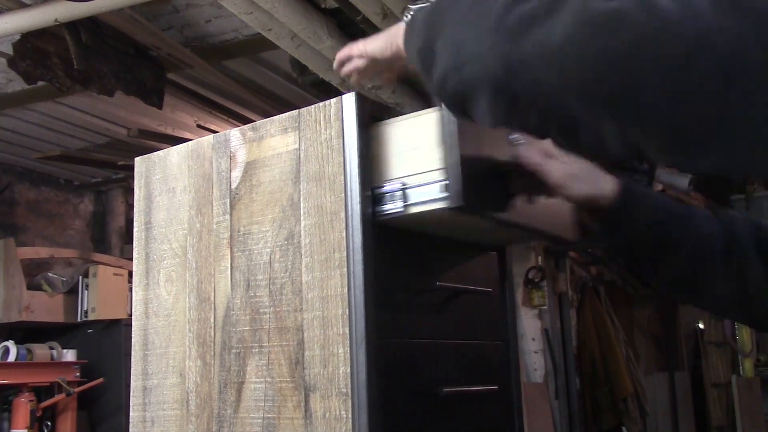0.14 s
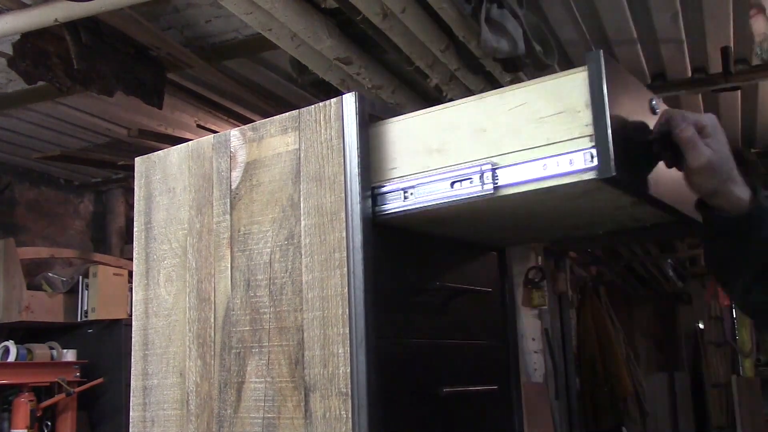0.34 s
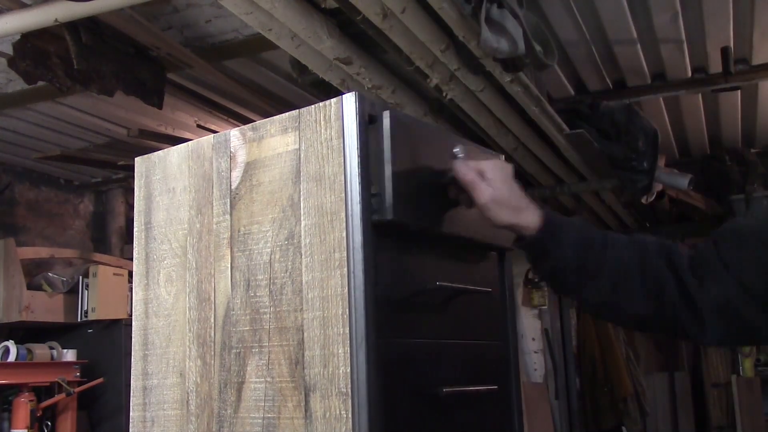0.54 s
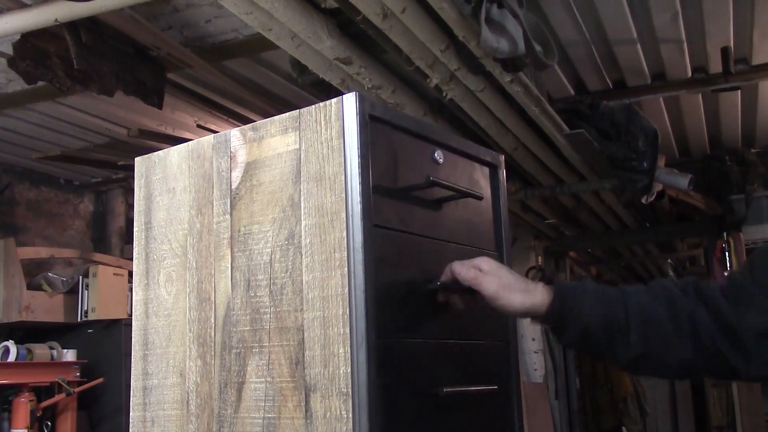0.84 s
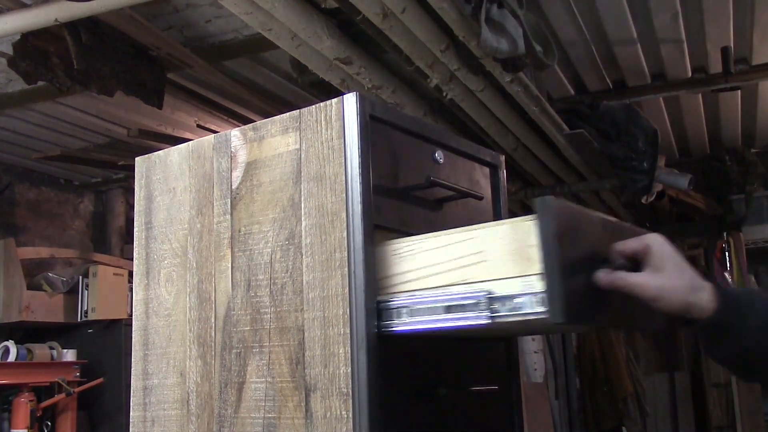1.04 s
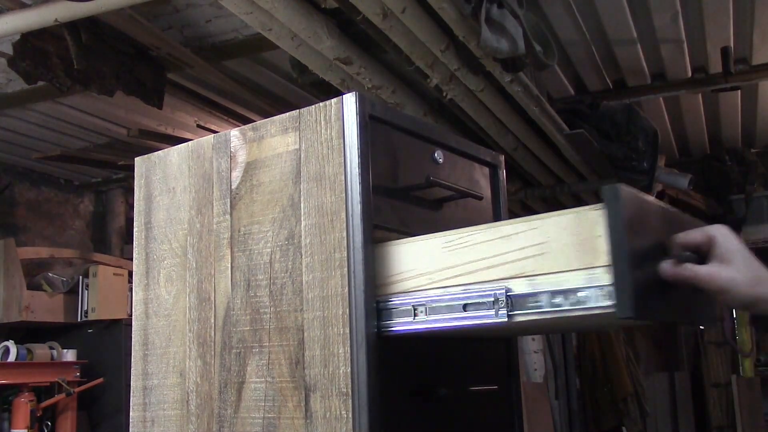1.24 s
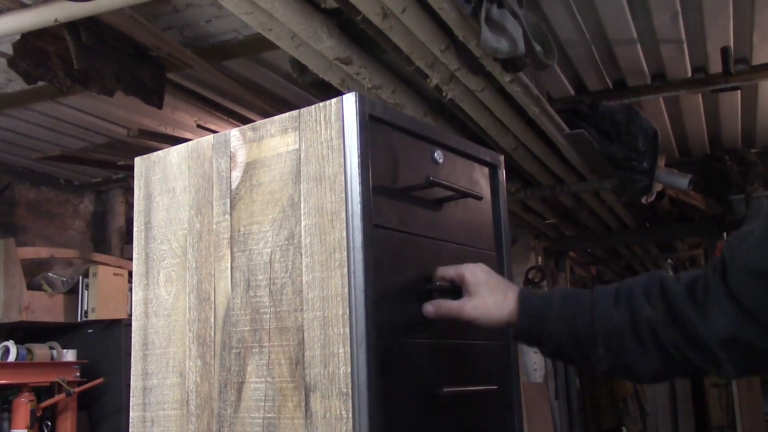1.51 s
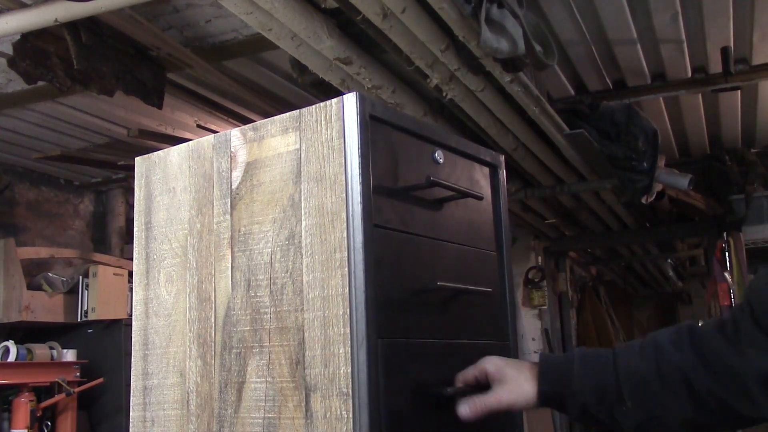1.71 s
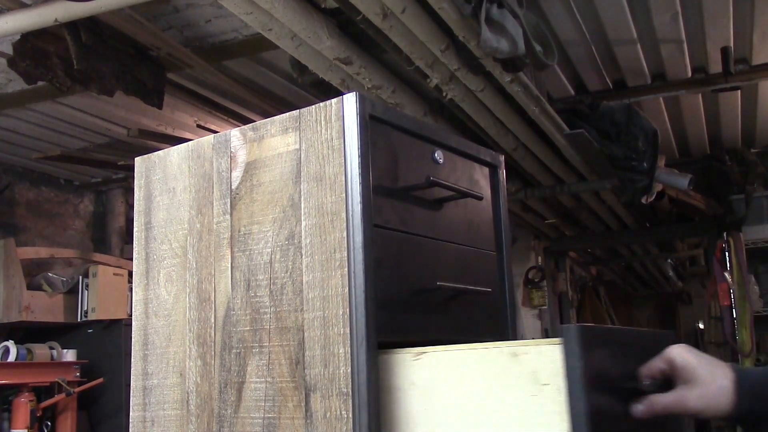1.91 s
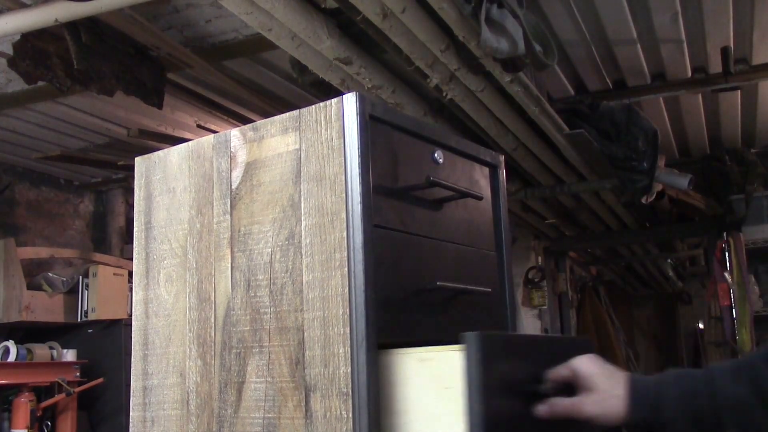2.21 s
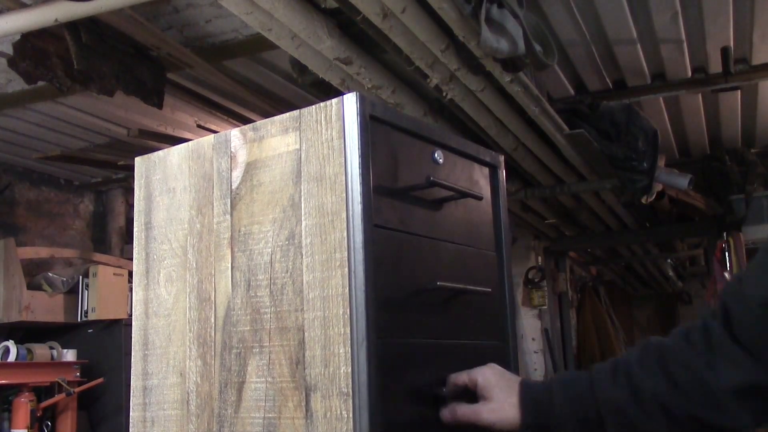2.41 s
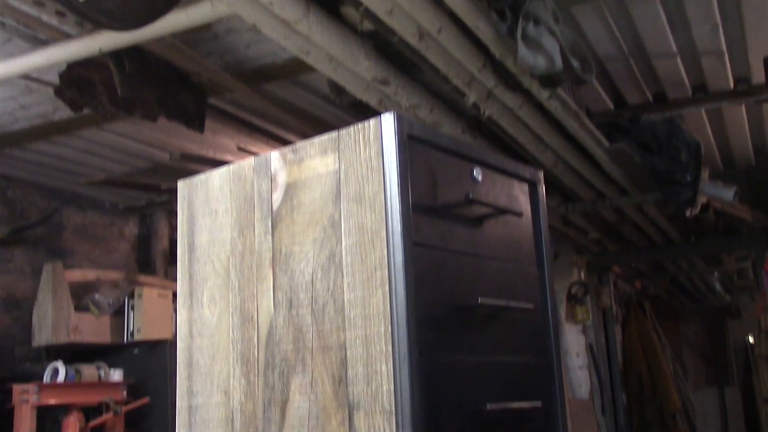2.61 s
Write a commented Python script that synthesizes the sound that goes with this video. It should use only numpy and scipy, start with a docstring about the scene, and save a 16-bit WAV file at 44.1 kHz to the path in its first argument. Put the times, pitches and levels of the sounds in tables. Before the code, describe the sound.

Three wooden drawers are pulled open and pushed shut in quick succession, close by in a workshop. Each rolls with a rattle on metal runners and closes with a sharp knock. Then it cuts to a quiet room.

```python
"""Three drawers in a workshop

Three wooden drawers are pulled out and pushed shut, one after another. Little steel balls rattle
along the rails and make each drawer ring. A pull ends on a rubber stop, a push in a slam that
booms in the cabinet. A limiter holds the loudest blows down. At the end the sound cuts to a
quiet room with one soft thud."""
import sys
import numpy as np
from scipy import signal
from scipy.fft import rfft, irfft, next_fast_len
from scipy.io import wavfile
from scipy.ndimage import uniform_filter1d

SR = 44100
rng = np.random.default_rng(int(sys.argv[2]) if len(sys.argv) > 2 else 0)


def unload_wav(signal):
    """Save mono or channel-first audio to the path in sys.argv[1] as 16-bit WAV at rate SR, clipped to [-1, 1]."""
    wavfile.write(
        sys.argv[1],
        SR,
        np.round(np.clip(np.atleast_2d(signal).T, -1, 1) * 32767).astype(np.int16),
    )


N = 121275
T = np.arange(N) / SR


def from_db(db):
    """Turn decibels into a number to multiply a sound by."""
    return 10 ** (np.asarray(db) / 20)


def rms_one(x):
    """Scale a sound so that its average strength (rms) is 1."""
    return x / np.sqrt(np.mean(x ** 2) + 1e-20)


def curve(rows):
    """Join (time_s, level_db) points with straight lines; silent outside them."""
    times, levels_db = np.transpose(rows)
    return np.interp(T, times, levels_db, left=-120, right=-120)


def burst(start_s, rise_s, fade_s):
    """An envelope (loudness over time) that rises, then falls by 60 dB every fade_s."""
    out = np.zeros(N)
    alive = (T > start_s) & (T < start_s + 2 * fade_s)
    age = T[alive] - start_s
    out[alive] = (1 - np.exp(-age / rise_s)) * np.exp(-np.log(1000) * age / fade_s)
    return out


def note(envelope, start_s, hz):
    """A pure tone whose loudness follows an envelope."""
    out, alive = np.zeros(N), envelope > 1e-6
    out[alive] = envelope[alive] * np.sin(2 * np.pi * hz * (T[alive] - start_s))
    return out


def colour(x, tone):
    """Make each pitch louder or softer, following (pitch_hz, level_db) points."""
    size = 2 * next_fast_len(N // 2 + SR // 4, True)
    hz, db = np.transpose(tone)
    bins_hz = np.maximum(np.fft.rfftfreq(size, 1 / SR), 1)
    gains = from_db(np.interp(np.log(bins_hz), np.log(hz), db))
    # a minimum-phase filter: it never rings before the sound arrives
    cepstrum = irfft(np.log(gains), size)
    cepstrum[1:size // 2] *= 2
    cepstrum[size // 2 + 1:] = 0
    return irfft(rfft(x, size) * np.exp(rfft(cepstrum)), size)[:N]


def noise(tone):
    """Steady noise with the given tone and strength 1."""
    return rms_one(colour(rng.standard_normal(N), tone))


def shaped_noise(envelope, tone):
    """Noise that follows an envelope and is then given a tone."""
    white = rng.standard_normal(N)
    return colour(envelope * white, tone) / np.std(colour(white, tone))


def gentle_filter(keep, hz):
    """A filter that keeps the "low" or the "high" side of a pitch."""
    return signal.butter(2, hz, keep, fs=SR, output="sos")


def resonate(x, hz, width_hz):
    """Let a sound ring at one pitch; a narrower band rings longer."""
    decay = np.exp(-np.pi * width_hz / SR)
    feedback = [1, -2 * decay * np.cos(2 * np.pi * hz / SR), decay ** 2]
    return signal.lfilter(np.array([1, 0, -1]) * (1 - decay ** 2) / 2, feedback, x)


def glide(x, hz, width_hz):
    """Let a sound ring at a pitch that slides."""
    turn = np.exp(2j * np.pi * np.cumsum(hz) / SR)
    decay = np.exp(-np.pi * width_hz / SR)
    return 2 * np.real(turn * signal.lfilter([1 - decay], [1, -decay], x / turn))


def stereo_hiss():
    """A very faint, dull hiss that makes left and right differ."""
    # tone of the hiss: pitch_hz, level_db
    hiss_tone = [(100,-5.5),(400,-2),(9000,-35.5)]
    return from_db(-67) * noise(hiss_tone)


def quiet_room():
    """A faint rumble with one soft thud."""
    # tones of the rumble and the thud: pitch_hz, level_db
    rumble_tone = [(15,-44),(98,-9),(174,-21),(225,-12),(358,-25),(600,-24),(839,-30),(2750,-36),(15600,-70)]
    thud_tone = [(30,-18.5),(90,5),(150,-11),(300,-9.5),(6000,-67)]
    thud = from_db(-38) * burst(start_s=2.6575, rise_s=0.0014, fade_s=0.12)
    return from_db(-53) * noise(rumble_tone) + shaped_noise(thud, thud_tone)


def workshop_background():
    """The low, steady noise of the workshop."""
    # tone of the room: pitch_hz, level_db
    room_tone = [(25,-21),(100,-16.5),(170,-11.5),(290,8.5),(450,0),(900,-6),(3000,-28.5),(15000,-38)]
    return from_db(-50) * noise(room_tone)


def workshop_echo(sound):
    """The room answers with a short, blurred echo, strongest in the bass."""
    # tone of the echo: pitch_hz, level_db
    echo_tone = [(60,-16.5),(150,-7),(300,-7),(600,-11.5),(2000,-28),(8000,-21),(16000,-21.5)]
    reflections = rng.standard_normal(N) * burst(start_s=0.021, rise_s=0.0077, fade_s=0.21)
    reflections = colour(reflections / np.sqrt(np.sum(reflections ** 2)), echo_tone)
    return from_db(-6) * signal.fftconvolve(sound, reflections)[:N]


def brushing():
    """A hand and sleeve brush the drawer fronts."""
    # loudness of the rubbing: time_s, level_db
    levels = [(0,-54.5),(0.08,-56),(0.16,-47.5),(0.3,-52),(0.78,-56),(0.812,-39.5),(0.835,-47),(0.857,-36.5),(0.9,-52.5),(1.0,-48.5),(1.7,-55),(1.745,-48.5),(1.79,-52),(2.5,-42)]
    # its tone: pitch_hz, level_db
    brush_tone = [(290, -45), (500, -11.5), (1220, -6.5), (2040, -11.5), (2260, -11.5), (3630, -15.5),
                  (15500, -26.5)]
    return from_db(curve(levels)) * noise(brush_tone)


def ticks():
    """Handles, latches and ball cages touch lightly: a bright click and a short ring."""
    # light touches of metal: start_s, click_db, ring_db
    touches = [(0.433,-44,-56),(0.763,-39.5,-56),(0.861,-35,-57),(0.872,-36,-53),(1.006,-32,-38),(1.0143,-29.5,-30),(1.032,-34,-34.5),
               (1.193,-25.5,-39),(1.54,-29,-49),(1.7326,-35,-55),(1.7604,-33.5,-57),(2.139,-47,-42),(2.324,-19,-29),(2.340,-30,-37)]
    # tone of a click: pitch_hz, level_db
    click_tone = [(300,-13.5),(1000,-2),(3000,1),(6000,-1.5),(10000,-8.5),(16000,-14.5)]
    # notes a steel latch rings at: pitch_hz
    latch_hz = [6140,8500,9100,10220,11100,11500,12150,13300]
    clicks = sum(from_db(db) * burst(start_s, rise_s=0.0001, fade_s=0.027) for start_s, db, _ in touches)
    out = clicks * noise(click_tone)
    for start_s, _, ring_db in touches:
        strengths = rng.random(len(latch_hz))
        tuning = 1 + 0.04 * rng.standard_normal()   # no two latches ring quite alike
        ring = from_db(ring_db) * burst(start_s, rise_s=0.0001, fade_s=0.0418)
        out += sum(gain * note(ring, start_s, hz * tuning) for hz, gain in zip(latch_hz, strengths))
    return out


def zings():
    """A steel catch or rail rings briefly in a narrow band of pitches."""
    # rings of steel: start_s, pitch_hz, width_hz, level_db, fade_s
    rings = [(1.4,8800,696,-12,0.017),(2.315,13200,1100,-22.5,0.072),(2.322,1575,110,-3,0.06)]
    out = np.zeros(N)
    for start_s, hz, width_hz, db, fade_s in rings:
        band = resonate(rng.standard_normal(N), hz, width_hz)
        band = rms_one(resonate(band, hz, width_hz))
        out += from_db(db) * burst(start_s, 0.0038, fade_s) * band
    return out


def snaps():
    """Steel hits steel with a short, bright crack where a runner reaches its end."""
    # hard hits: start_s, level_db
    hits = [(0.6724,-7),(1.1700,-20),(1.4168,-6.5),(1.5708,-26.5),(1.5781,-4.5),(2.4595,-9)]
    # tone of a crack: pitch_hz, level_db
    crack_tone = [(400,-26.5),(1500,4),(6300,-0.5),(9000,-7.5),(16000,-12)]
    cracks = sum(from_db(db) * burst(start_s, rise_s=0.0001, fade_s=0.008) for start_s, db in hits)
    return shaped_noise(cracks, crack_tone)


def bumps():
    """A drawer knocks against its cabinet, giving short hollow notes that swell and fade."""
    # soft hits: start_s, pitch_hz, level_db, swell_s
    hits = [(0.169,380,-27,0.009),(0.206,1062,-18.5,0.0083),(0.209,632,-17,0.0068),(1.006,1258,-17.5,0.004),(1.4045,607,-8,0.0023),(1.4175,614,0.5,0.0052),(1.428,680,-16,0.0037),(1.444,589,-9,0.0033),(1.447,354,-13.5,0.0065),(1.731,500,-37,0.005),(1.93,424,-16,0.0059),(2.0819,452,-2.5,0.0035),(2.101,420,-18,0.0041),
            (2.19,868,-21.5,0.0075),
            (2.324,489,-7.5,0.0036),(2.328,354.7,-14.5,0.012),(2.3405,513,-0.5,0.0023),(2.359,575,-11.5,0.0061)]
    notes = np.zeros(N)
    for start_s, hz, db, swell_s in hits:
        swells = np.maximum(T - start_s, 0) / swell_s   # the note is loudest when this is 1
        envelope = from_db(db) * swells * np.exp(1 - np.minimum(swells, 60))
        notes += note(envelope, start_s, hz)
    return signal.sosfilt(gentle_filter("high", hz=280), notes)


def knocks():
    """Catches, stops and fronts knock: steel cracks, the box and wood panels ring, the rails shiver."""
    # knocks: start_s, wood_db, body_db, metal_db, length (multiplies the fade times)
    hits = [(0.001,-39,-45,-48,0.89),(0.2086,-24.5,-19.5,-38,1.24),(0.6424,-26,-6.5,-11.5,0.38),(0.6697,-15,0.5,-6.5,0.99),
            (0.878,-31.5,-37,-58,0.85),(0.974,-35.5,-36.5,-56,1.6),(1.0025,-26.5,-23,-33,0.92),(1.1685,-22.5,-15.5,-14.5,0.69),
            (1.4033,-29,-23,-18,0.38),(1.4143,-24,-4.5,-14,0.8),(1.569,-18,-15.5,-17.5,0.28),(1.5767,-15,-2.5,-12,0.93),(1.726,-36,-51,-60,1.9),
            (1.834,-30.5,-15.5,-30.5,1.12),(2.078,-30.5,-20.5,-28,1.75),(2.315,-38.5,-10.5,-24,2.08),(2.339,-26,-32,-33.5,1.55),(2.458,-10.5,-6.5,-11,0.76)]
    # tones of the wood panels, the drawer's body and the steel: pitch_hz, level_db
    wood_tone = [(30,-16.5),(60,-21),(105,-15.5),(138,-4),(200,2),(232,-4.5),(290,5.5),(450,6.5),(650,-1),(1200,-25.5),(4000,-73.5)]
    body_tone = [(100,-68.5),(300,-11.5),(550,0.5),(800,-1.5),(1150,3),(1600,-7),(2800,-15),(5000,-27.5),(15000,-66)]
    metal_tone = [(400,-46.5),(1500,3.5),(3000,9.5),(5000,-0.5),(8000,-7.5),(12000,-10),(16000,-30)]
    wood, body, metal = np.zeros((3, N))
    for start_s, wood_db, body_db, metal_db, length in hits:
        wood += from_db(wood_db) * burst(start_s, rise_s=0.0016, fade_s=0.2 * length)
        body += from_db(body_db) * burst(start_s, rise_s=0.0038, fade_s=0.12 * length)
        crack = burst(start_s, rise_s=0.0019, fade_s=0.036 * length)
        shiver = from_db(-9) * burst(start_s, rise_s=0.0038, fade_s=0.14 * length)
        metal += from_db(metal_db) * (crack + shiver)
    return shaped_noise(wood, wood_tone) + shaped_noise(body, body_tone) + shaped_noise(metal, metal_tone)


def cabinet_boom():
    """Each slam makes the cabinet ring at its own notes, in a slightly different mix."""
    # a drawer front meets the cabinet: start_s, level_db
    slams = [(-0.12,-0.5),(0.646,-14.5),(0.681,-5),(1.586,-1),(2.466,-21.5)]
    # the cabinet's notes: pitch_hz, level_db, fade_s
    cabinet_notes = [(144.7,-21,0.19),(190.6,-19,0.21),(283.7,2,0.12),(292.7,-28,0.54),(351,-23.5,0.17),(445,-24,0.056),(543,-24,0.096),(570,-25,0.16),(887,-14.5,0.14),(1130,-7.5,0.079),(1790,-17.5,0.13)]
    out = np.zeros(N)
    for start_s, slam_db in slams:
        for hz, note_db, fade_s in cabinet_notes:
            gain = from_db(slam_db + note_db + rng.normal(0, 1))
            out += gain * note(burst(start_s, 0.0072, fade_s), start_s, hz)
    return out


def ball_contacts(per_second=11000, spread_db=1.8, judder_db=1.4):
    """Rolling balls make thousands of tiny taps of uneven strength."""
    sizes = from_db(spread_db * np.minimum(rng.exponential(1, N), 4)) * rng.choice([-1, 1], N)
    judder = rms_one(signal.sosfilt(gentle_filter("low", hz=130), rng.standard_normal(N)))
    tapping = rng.random(N) < per_second / SR
    return sizes * tapping * from_db(judder_db * judder)


def slide(levels, tone, box, direction, gain_db, treble_db_per_s):
    """One pull or push: the balls ring the box and the rails; faster is louder and brighter."""
    # where the steel rails ring at half travel: pitch_hz, width_hz, boost_db
    rails = [(940,16,-4),(1550,44,-1.5),(2435,90,7),(2720,78,5),(3770,120,4)]
    taps = ball_contacts()
    level_db = curve(levels)
    times, points_db = np.transpose(levels)
    # the rails' pitch falls as the drawer comes out and rises as it goes in
    travel = np.cumsum(from_db(level_db / 2))
    bend = 1 + direction * 0.18 * (travel / travel[-1] - 0.5)
    box_ring = sum((from_db(db) - 1) * resonate(taps, hz, width) for hz, width, db in box)
    rail_ring = sum((from_db(db) - 1) * glide(taps, hz * bend, width) for hz, width, db in rails)
    rattle = rms_one(colour(taps + box_ring + rail_ring, tone))
    # the treble follows the loudness and also drifts over time
    treble = signal.sosfiltfilt(gentle_filter("high", hz=3680), rattle)
    follow_db = 0.17 * (level_db - np.median(points_db))
    drift_db = treble_db_per_s * (np.clip(T, times[0], times[-1]) - times.mean())
    return from_db(level_db + gain_db) * (rattle + (from_db(follow_db + drift_db) - 1) * treble)


def rolling_drawers():
    """Each of the three drawers rolls out and back in."""
    # loudness of the rolling, which follows the drawer's speed: time_s, level_db
    pull_1 = [(0.12,-69),(0.168,-44),(0.178,-34),(0.21,-21.5),(0.25,-19.5),(0.29,-24),(0.37,-28.5),(0.42,-47),(0.435,-72)]
    push_1 = [(0.43,-61),(0.437,-34),(0.452,-36.5),(0.495,-19.5),(0.545,-21),(0.565,-20),(0.63,-27.5),(0.67,-14),(0.71,-34)]
    pull_2 = [(0.955,-67),(0.998,-29),(1.01,-20.5),(1.045,-25.5),(1.13,-25.5),(1.165,-24),(1.21,-23),(1.25,-28.5),(1.305,-48.5)]
    push_2 = [(1.3,-51),(1.328,-29),(1.37,-20.5),(1.41,-16.5),(1.47,-22.5),(1.51,-25.5),(1.565,-26),(1.6,-41)]
    pull_3 = [(1.795,-58),(1.828,-30.5),(1.836,-20),(1.9,-20),(1.98,-21),(2.045,-29),(2.08,-27.5),(2.12,-41.5),(2.175,-61)]
    push_3 = [(2.168,-56),(2.192,-28.5),(2.25,-14.5),(2.315,-17),(2.35,-23.5),(2.39,-32),(2.44,-32.5),(2.46,-35.5),(2.48,-60)]
    # tone of each move: pitch_hz, level_db
    pull_1_tone = [(53, -60.5), (282, -4), (398, -18.5), (463, -5.5), (612, -1), (846, -5), (963, -8.5),
                   (1170, -5), (1610, -4.5), (2480, -10), (15500, -40.5)]
    push_1_tone = [(53, -103), (183, -35.5), (222, -39), (389, -7), (515, -3.5), (828, -2), (963, -14.5),
                   (1170, -2), (1610, -8), (2480, -9.5), (15500, -38)]
    pull_2_tone = [(53, -67), (335, 1), (810, 2), (942, 1.5), (1170, -2), (1510, -1.5), (2140, -8.5),
                   (2590, -7.5), (4260, -16.5), (7140, -24), (15500, -37)]
    push_2_tone = [(53, -67), (463, 5), (639, 4.5), (983, 4), (1140, 1), (1760, -1), (2430, -4), (2710, -2),
                   (3080, -6), (4080, -12), (15500, -31)]
    pull_3_tone = [(53, -68), (204, -39), (314, -16.5), (407, -3), (463, -11.5), (586, -4.5), (743, -13.5),
                   (902, -5), (1070, -10.5), (2090, -11.5), (15500, -50.5)]
    push_3_tone = [(53, -64.5), (232, -49.5), (259, -27), (398, -6.5), (586, -3.5), (653, -13), (983, -0.5),
                   (1070, -7.5), (1220, -4), (2770, -9), (15500, -42)]
    # where each drawer box rings: pitch_hz, width_hz, boost_db
    box_1 = [(483,75,6.5),(649,39,7.5),(868,48,10),(1136,97,8),(1340,22,-8)]
    box_2 = [(282,35,4),(1154,15,12.2),(1343,69,7.8)]
    box_3 = [(380,48,6.7),(617,29,4.8),(893,18,8.8),(1003,31,6.2),(1203,100,5.2),(1610,33,5.7)]
    outward, inward = -1, 1
    return (slide(pull_1, pull_1_tone, box_1, outward, gain_db=0.5, treble_db_per_s=-31)
            + slide(push_1, push_1_tone, box_1, inward, gain_db=1.2, treble_db_per_s=-21.5)
            + slide(pull_2, pull_2_tone, box_2, outward, gain_db=0.5, treble_db_per_s=-10)
            + slide(push_2, push_2_tone, box_2, inward, gain_db=0.75, treble_db_per_s=-31.5)
            + slide(pull_3, pull_3_tone, box_3, outward, gain_db=0.4, treble_db_per_s=3)
            + slide(push_3, push_3_tone, box_3, inward, gain_db=0.99, treble_db_per_s=0))


def scene():
    """The drawers in the workshop, then the cut to the quiet room; left and right are nearly alike."""
    drawers = rolling_drawers() + knocks() + snaps() + ticks() + zings() + bumps()
    drawers += cabinet_boom() + brushing()
    workshop = drawers + workshop_echo(drawers) + workshop_background()
    side = stereo_hiss()
    cut_s, blend_s = 2.522, 0.0021
    before_cut = np.clip((cut_s - T) / blend_s, 0, 1)
    middle = before_cut * workshop + (1 - before_cut) * quiet_room()
    return np.array([middle + side, middle - side])


def record(dry):
    """A limiter turns loud blows down; then the bass is cut, peaks are rounded and the top is cut."""
    limit_db, release_db_per_s, ceiling, top_hz = -0.5, 200.5, 0.93, 15750
    peak_db = 20 * np.log10(np.abs(dry).max(axis=0) + 1e-9)
    over_db = np.maximum(peak_db - limit_db, 0)
    # after each peak the volume comes back at a steady rate
    held_db = np.maximum.accumulate(over_db + release_db_per_s * T) - release_db_per_s * T
    limited = dry * from_db(-uniform_filter1d(held_db, size=150))
    limited = signal.sosfilt(gentle_filter("high", hz=64), limited)
    rounded = limited / (1 + (limited / ceiling) ** 12) ** (1 / 12)
    return signal.sosfilt(signal.ellip(10, 0.2, 80, top_hz, fs=SR, output="sos"), rounded)


dry = scene()
out = record(dry)
unload_wav(out)
```